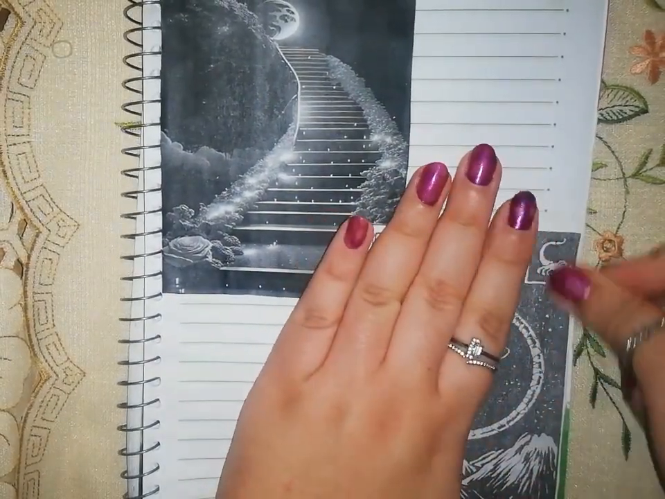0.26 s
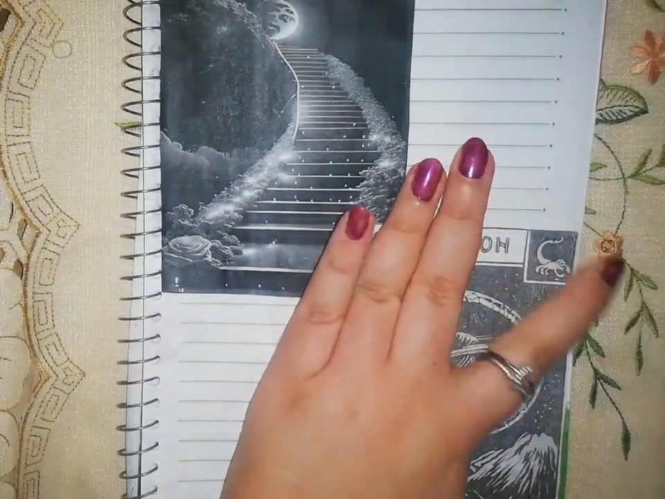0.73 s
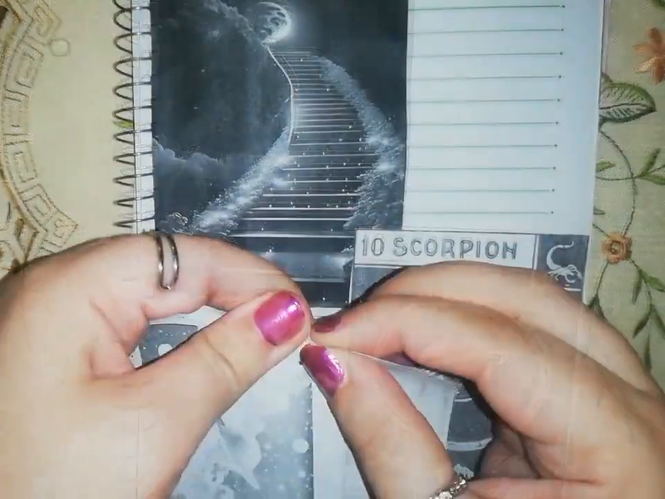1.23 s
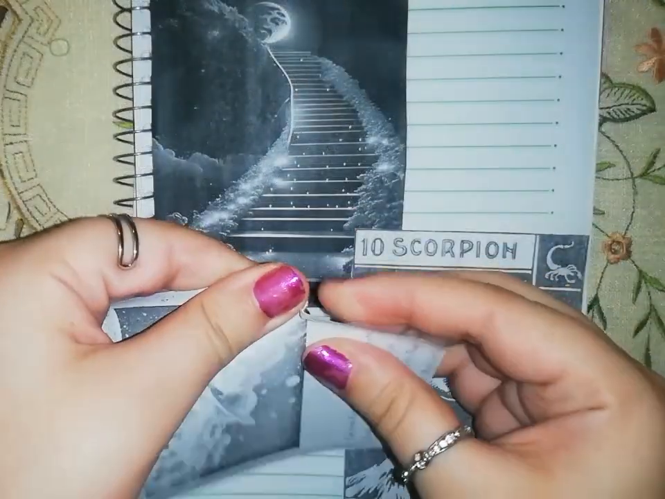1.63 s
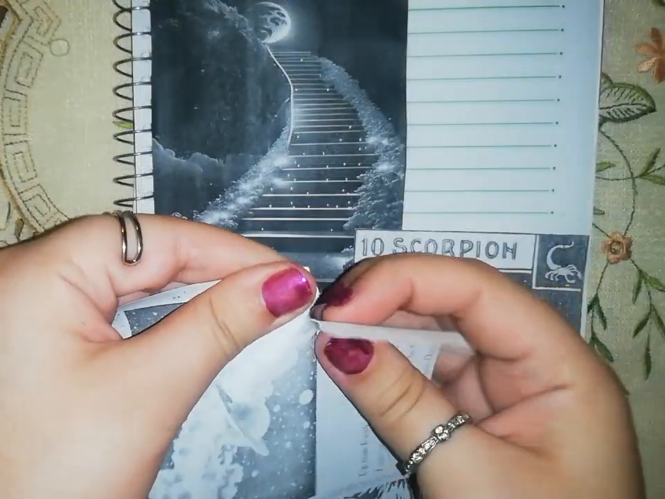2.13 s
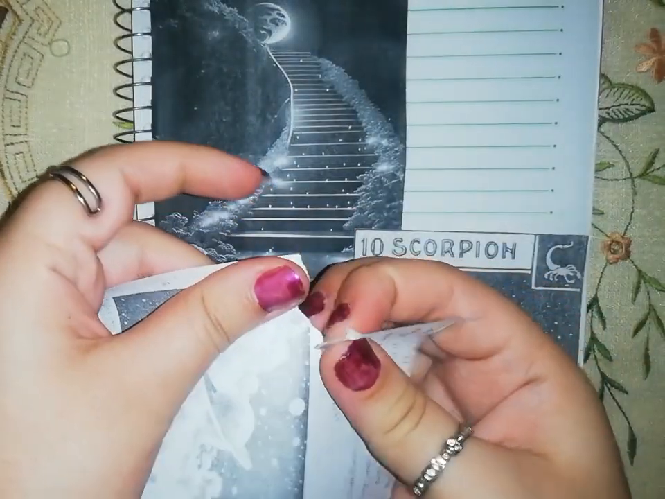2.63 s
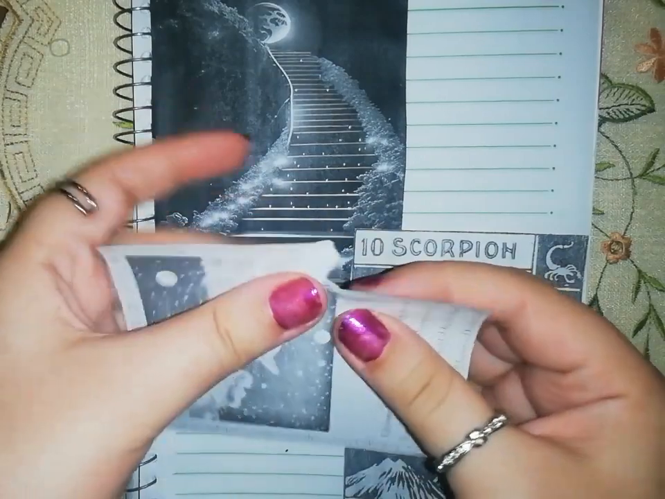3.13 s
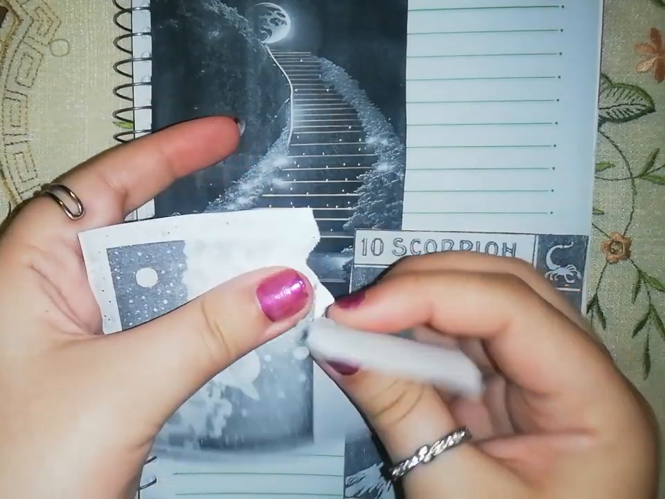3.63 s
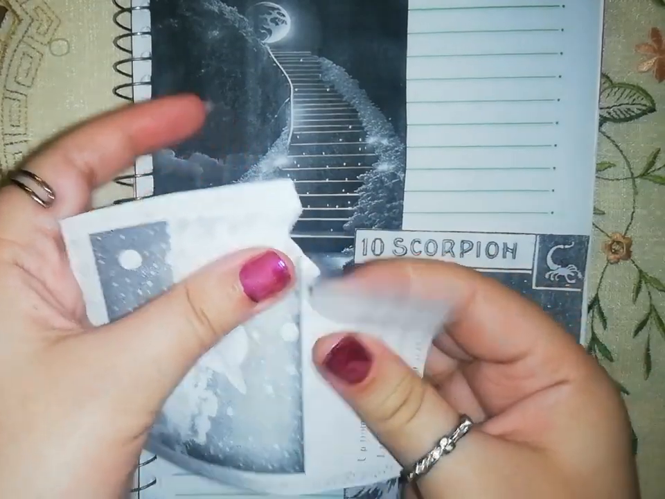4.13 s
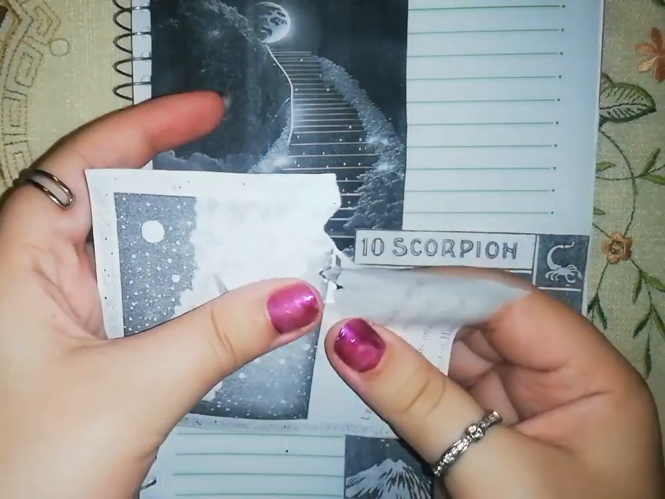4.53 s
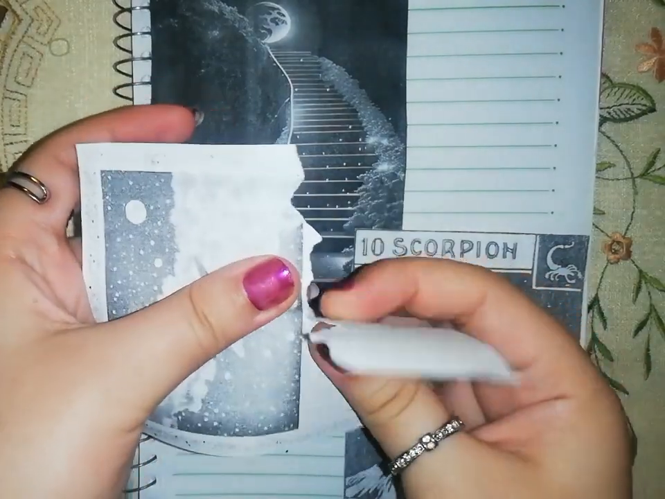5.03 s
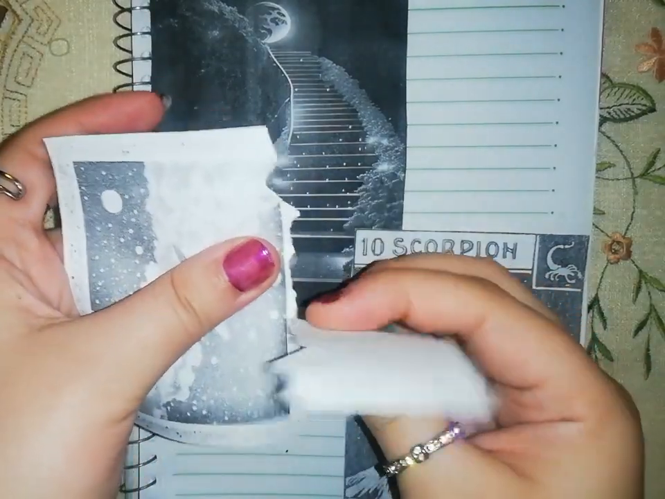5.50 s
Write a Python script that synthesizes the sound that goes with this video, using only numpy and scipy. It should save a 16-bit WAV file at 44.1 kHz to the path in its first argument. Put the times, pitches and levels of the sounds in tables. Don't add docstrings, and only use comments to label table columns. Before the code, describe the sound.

In a small quiet room with faint hum and hiss, hands pat a notebook with low soft thumps and lightly brush the page. After about a second, paper rustles and tears very close to a phone microphone, in short crisp rips broken by light crinkles, pops and pauses. The tearing is sharp on the left, duller and scattered on the right.

```python
import sys
import numpy as np
from scipy import signal
from scipy.fft import rfft, irfft
from scipy.io import wavfile
from scipy.ndimage import uniform_filter1d, map_coordinates

SR = 44100
rng = np.random.default_rng(int(sys.argv[2]) if len(sys.argv) > 2 else 0)


def volts_from_db(level):
    exponent = np.asarray(level, float) / 20
    return 10 ** exponent


def dump(signal):
    limited = np.clip(np.atleast_2d(signal).T, -1, 1)
    pcm = np.round(limited * 32767).astype(np.int16)
    wavfile.write(sys.argv[1], SR, pcm)


N = 254016
TIME = np.arange(N) / SR
HZ = np.maximum(np.fft.rfftfreq(N, 1 / SR), 1)

# pitch_hz, level_db (per Hz)
ROOM_HISS = [(12, -27), (20, -6.5), (48, -0.5), (108, -5), (143, -0.5), (480, -16), (772, -14), (2510, -16),
             (8890, -19), (15200, -25.5), (16500, -40)]
# pitch_hz, likeness (-1 to 1)
ROOM_LIKENESS = [(60, 0.91), (130, 0.92), (290, 0.096), (640, -0.79), (1400, 0.31), (3000, -0.1)]
# pitch_hz, width_hz, lift_db
PORT_RINGS = [(9000, 1100, 3.5), (10880, 1000, 8)]
# start_s, end_s, level_db
STROKES = [
    (0.047, 0.133, -59),
    (0.149, 0.323, -55.5),
    (0.344, 0.433, -60.5),
    (0.476, 0.554, -58.5),
    (0.627, 0.66, -56),
    (0.683, 0.795, -60),
    (0.823, 0.916, -63.5),
]
# start_s, peak_db, pad_ring_hz
THUMPS = [(0.075, -31, 102), (0.087, -40, 215), (0.11, -43, 65.4), (0.137, -44.5, 350), (0.155, -26.5, 110),
          (0.478, -33.5, 113), (0.488, -52, 192), (0.502, -42, 70.4), (0.526, -51, 120), (0.543, -53, 157),
          (0.827, -40, 217.3), (0.913, -53, 177), (1.056, -55.5, 247), (0.44, -57, 190), (0.33, -54, 170),
          (0.255, -58, 150), (1, -48, 297), (1.516, -52.5, 214), (2.711, -51.5, 228), (2.554, -56, 263),
          (2.745, -55, 170), (2.969, -49, 260), (3.25, -54, 199), (4.21, -56, 170), (4.48, -53, 190),
          (5.142, -55, 197), (5.626, -53.5, 307)]
# pitch_hz, level_db, t60_s
TABLE_MODES = [(60.5, 1, 0.43), (107.4, -7, 0.65), (170, 5.5, 0.073), (214, 8.5, 0.047), (320, -43, 0.12)]
# pitch_hz, level_db (per Hz)
PAPER_COLOUR = [(1300, -10.5), (2300, -12), (2800, -9.5), (4400, -9), (7300, -7.5), (8900, -4.5),
                (10500, -10), (15200, -24.5), (16400, -51)]
# pitch_hz, level_db (per Hz)
SHEET_COLOUR = [(200, -24.5), (450, -20), (750, 2.5), (1000, -0.5), (1200, 3.5), (1800, 2), (3000, -1),
                (5000, -50.5)]
# peak_s, crackle_db,
# rise_s, fall_s, sheet_minus_crackle_db
SHEET_PULLS = [(1.313, -41, 0.078, 0.091, 3), (1.362, -44, 0.053, 0.054, -0.5), (1.917, -41, 0.063, 0.082, -10),
               (2.389, -32, 0.04, 0.04, -8), (2.538, -27.5, 0.015, 0.034, -1.5), (2.564, -25.5, 0.027, 0.059, -9),
               (3.45, -31, 0.0073, 0.046, -30), (3.471, -31, 0.037, 0.065, -17),
               (3.818, -32.5, 0.0082, 0.024, -10.5), (3.856, -41.5, 0.054, 0.12, -7),
               (4.748, -26, 0.014, 0.0092, -12), (4.765, -39, .02, 0.066, -26), (4.862, -30, 0.011, 0.11, -14.5),
               (4.922, -35.5, 0.048, 0.047, -20), (4.939, -35, 0.051, 0.031, -14),
               (5.346, -43.5, 0.0058, 0.19, -12), (5.378, -42, 0.023, 0.054, -15), (5.42, -32, 0.066, 0.096, -22),
               (5.493, -37.5, 0.15, 0.019, -17.5),
               (1.009, -62.5, 0.0082, 0.05, 13.5), (1.161, -56.5, 0.0046, 0.2, 8.5),
        (1.535, -56.5, 0.12, 0.033, -3), (1.609, -47, 0.0096, 0.049, -10), (1.865, -56, .021, .1, -13),
        (2.085, -51.5, 0.045, 0.085, -6), (2.158, -36.5, 0.019, 0.016, -10),
        (2.272, -50.5, 0.063, 0.16, -14), (2.43, -49.5, 0.019, 0.24, -3.5), (2.64, -58, .03, 0.059, -4),
        (2.755, -43, 0.042, 0.039, 1), (2.992, -55, 0.06, 0.022, 16), (2.95, -49.5, 0.075, 0.045, -2.5),
        (3.208, -49, 0.0083, 0.06, 8), (3.16, -56.5, 0.063, 0.069, -1.5), (3.66, -51, 0.1, 0.042, -6),
        (3.736, -42, 0.022, 0.055, -18.5), (4.065, -44, 0.079, 0.061, -3.5), (4.212, -44, 0.041, 0.061, -6),
        (4.372, -49.5, 0.028, 0.077, -3), (4.43, -56, 0.035, 0.09, 4), (5.155, -58.5, 0.049, 0.077, 2),
        (5.556, -43.5, 0.033, 0.027, -23), (5.62, -50.5, 0.046, 0.15, -6.5)]
# start_s, crackle_db, length_ms
CRACKS = [(1.855, -23, 0.94), (1.865, -36, 2.1), (1.8982, -27, 0.97), (1.9166, -26, 2.7),
          (1.8962, -29, 1.6), (1.9593, -36, 0.91), (2.043, -31.5, 0.96), (2.094, -22, 0.806),
          (2.148, -46, 1), (2.2651, -27, 3.2), (2.287, -35.5, 2.2), (2.3779, -31, 3), (2.8485, -49.5, 15),
          (3.368, -40, 0.95), (3.491, -29, 3.4), (3.523, -32, 2.6), (3.548, -34.5, 3.2), (3.7372, -33, 1.4),
          (3.777, -38, 1.6), (3.863, -27.5, 2), (3.91, -37, 1.7), (3.974, -46, 1.2), (4.0247, -27.5, 0.9),
          (4.6958, -43.5, 0.33), (4.7146, -30, 0.6), (4.7208, -24, 2.8), (4.7426, -40, 2.1), (4.89, -25, 2),
          (5.409, -27, 1.3), (5.6104, -42, 9)]
# start_s, crackle_db
TICKS = [(1.8494, -34), (1.8851, -26.5), (1.9803, -38), (2.0019, -53), (2.5, -48), (2.527, -40),
         (2.961, -34), (4.003, -40), (2.195, -45), (2.271, -36), (2.2783, -30.5), (2.331, -42), (2.37, -35),
         (3.425, -44), (3.555, -36), (3.5676, -40), (3.794, -39), (3.984, -39), (4.668, -49), (5.298, -48),
         (1.159, -46), (1.184, -42.5), (1.2175, -55), (1.234, -44), (1.2635, -59), (1.32, -44),
         (1.4382, -50.5), (2, -50), (2.157, -70), (4.404, -45), (3.852, -34), (3.858, -36), (3.922, -43),
         (3.4338, -43), (3.453, -23), (5.412, -42), (5.353, -43), (2.55, -31), (2.559, -23), (2.568, -33),
         (2.598, -42), (4.885, -33), (4.864, -34), (4.87, -43), (0.985, -58)]
# start_s, crackle_db
NICKS = [(1.869, -24.5), (1.9755, -43), (2.383, -22.5), (4.946, -37), (5.4222, -39), (1.31, -46),
         (1.316, -39), (1.34, -36), (1.8737, -26), (1.8805, -35), (1.909, -36), (1.914, -38), (1.9227, -32),
         (1.937, -48), (1.967, -43), (2.361, -38), (2.372, -32), (2.397, -36), (2.401, -36), (2.476, -48),
         (2.525, -40), (2.541, -30), (2.5622, -32), (2.6098, -46), (3.438, -37), (3.4451, -29),
         (3.4485, -41), (3.4632, -43), (3.47, -31), (3.4935, -25.5), (3.503, -40), (3.5613, -41),
         (3.787, -44), (3.8189, -34), (3.8454, -29), (3.853, -37), (3.888, -36), (3.899, -35),
         (4.0614, -42), (4.426, -54), (4.86, -27), (4.915, -31), (4.916, -31), (4.9369, -24), (5.351, -51),
         (5.372, -41), (5.414, -42), (5.431, -41), (5.4437, -36), (5.451, -31), (5.4604, -22.5),
         (5.4625, -39), (5.477, -30), (5.488, -35), (5.4962, -35), (5.501, -40)]
# start_s, crackle_db, length_ms, sheet_minus_crackle_db
FOLDS = [(1.2385, -37, 0.67, -5.5), (2.076, -41, 7.6, -12), (2.3918, -31.5, 11.3, -13.5),
         (2.44, -31, 5.9, -11), (2.4692, -43, 2.5, -24), (2.5357, -23, 1, -12), (2.581, -30.5, 9.1, -21),
         (2.5924, -29, 0.66, -12.5), (2.746, -33.5, 1.3, -2.5), (2.9465, -35, 2.1, -3.5),
         (3.456, -48, 0.91, -7), (3.8148, -28, 1.6, -18), (3.874, -17.5, 1.7, -20.5),
         (4.2656, -31.5, 1.1, -9), (4.323, -45, 2.1, 1.5), (4.735, -47, 2.4, -21),
         (4.755, -29.5, 3.6, -15.5), (4.835, -35, 4.2, -21), (4.843, -27, 4.5, -14), (4.855, -35, 9.7, -26),
         (4.9336, -24, 1.8, -18.5), (4.9432, -21.5, 2.2, -28), (5.0702, -33, 1.16, -11.5),
         (5.1042, -43, 2.6, -4), (5.292, -47.5, 0.38, -21), (5.3052, -50, 2.6, -25),
         (5.3322, -30, 1.16, -32), (5.3363, -31.5, 3.6, -15.5), (5.382, -33.5, 2.7, -31),
         (5.3896, -30.5, 3.2, -34), (5.4576, -23.5, 0.8, -21.5)]
# start_s, sheet_db, crackle_minus_sheet_db, length_ms, ring_hz
POPS = [(1.1513, -44, 1.5, 10.2, 810), (1.176, -43, -33, 6.2, 950), (1.2, -47, -0.5, 4, 945),
        (1.3128, -38, -8, 2.6, 2220), (1.3428, -38, -1, 3.2, 1810), (1.3588, -33.5, -9, 4.2, 1790),
        (1.625, -48, -16, 9.9, 850), (2.573, -30.5, 5, 1.1, 1000), (2.6522, -49, 6, 3.8, 740),
        (2.7133, -35, 4.5, 1.5, 760), (2.759, -44, -19, 2.15, 1220), (3.2008, -29.5, -18, 3.2, 2601),
        (3.2241, -39.5, 1.5, 3.7, 606), (4.068, -32, 1, 4.6, 1870), (4.2102, -37.5, 4.5, 1.05, 900),
        (4.37, -48.5, 6, 7.7, 1205), (5.143, -48.5, 2.5, 2.9, 810), (5.157, -38, -30, 2.7, 750)]
# start_s, sheet_db, crackle_minus_sheet_db, length_ms, ring_hz
SLAPS = [(1.0006, -32.5, -19, 2.14, 910), (1.5991, -45, -6, 0.35, 1990), (2.973, -44.5, -14, 11, 890),
         (2.9804, -37, -5, 0.6, 3380), (2.994, -48, -21, 7, 1040), (1.013, -43.5, -17, 3.3, 1420),
         (1.022, -56.5, -16, 25, 2700), (4.4246, -43, -18, 1.2, 2200), (4.2927, -40.5, -10, 2, 950),
         (4.413, -28.5, -15, 3.9, 2080), (5.626, -43.5, -5.5, 1.6, 814)]
# start_s, sheet_db, ring_hz
CRINKLES = [(0.919, -56.5, 850), (1.728, -53.5, 800), (2.885, -52, 905.6), (3.03, -49.5, 840),
            (3.0714, -49, 920), (3.103, -51, 905), (3.159, -53, 1900), (3.249, -45, 1100),
            (3.266, -47, 745), (3.658, -56, 1120), (3.7, -54.5, 800), (4.038, -46, 1000), (4.19, -50, 775),
            (4.473, -48.5, 900), (4.491, -52.5, 890), (4.514, -48.5, 1090), (4.54, -56, 694),
            (5.543, -52.5, 910), (5.65, -52, 900)]
# time_s, brightest_hz
FLAP_AIM = [(1.1, 6700), (1.8, 7500), (2.0, 8500), (2.3, 9000), (2.38, 6740), (2.56, 6900), (3.2, 7740),
            (3.45, 9300), (3.8, 7950), (3.9, 9000), (4.7, 7560), (4.86, 7860), (4.93, 9450), (5.3, 5740),
            (5.36, 5900), (5.4, 9700), (5.46, 6850), (5.7, 7600)]
# start_s, end_s, pitch_hz, lift_db
GRIPS = [(0.987, 1.1, 6480, -19), (.99, 1.1, 1450, 3.5), (0.992, 1.097, 3730, 2), (1.137, 1.244, 870, 6.5),
         (1.14, 1.243, 5080, 12), (1.14, 1.25, 9150, 5), (1.14, 1.4, 5660, -9), (1.14, 1.25, 4340, -9),
         (1.26, 1.4, 4590, 5.5), (1.256, 1.4, 7970, 3), (1.247, 1.4, 9500, -0.5), (1.252, 1.4, 3680, 4),
         (1.839, 1.945, 2290, 9), (1.84, 1.937, 6850, 8.5), (1.846, 1.99, 9000, 3.5),
         (1.84, 1.95, 10300, -7), (1.84, 1.953, 4400, -4), (2.347, 2.42, 2219, -14),
         (2.347, 2.47, 5060, -11), (2.353, 2.47, 6770, 7), (2.354, 2.42, 8340, -3.5),
         (2.414, 2.47, 3470, 7.5), (2.42, 2.47, 1130, 3), (2.52, 2.615, 2680, -6), (2.52, 2.62, 5000, -1.5),
         (2.52, 2.62, 9900, -6), (2.526, 2.62, 3540, 5.5), (2.93, 3.02, 7500, -2), (3.19, 3.28, 7150, 5),
         (3.19, 3.28, 6070, 3), (0.148, .32, 8500, 3), (3.43, 3.57, 2330, 5), (3.427, 3.58, 5150, 3.5),
         (3.43, 3.56, 3880, -5), (3.43, 3.567, 11500, 7), (3.8, 3.932, 2480, -17), (3.8, 3.93, 4400, -8),
         (4.4, 4.432, 3500, 6.5), (4.398, 4.47, 6780, 2), (4.4, 4.47, 5360, -9), (4.7, 4.79, 3500, 6.5),
         (4.7, 4.91, 1320, -14), (4.702, 4.78, 9780, -4), (4.694, 4.79, 7300, -1), (4.915, 4.98, 8900, 3.5),
         (5.32, 5.522, 1950, 7), (5.32, 5.417, 3360, 8), (5.315, 5.4, 7650, -9), (5.32, 5.52, 2630, -10),
         (5.4, 5.52, 4870, 6.5)]
# time_s, lag_ms
PAGE_GAP = [
    (1.0, .68),
    (3.3, .68),
    (3.45, .62),
    (3.6, .68),
    (5.28, .68),
    (5.33, .77),
    (5.47, .77),
    (5.55, .68),
]
# pitch_hz, width_hz, lift_db
HAND_HOLLOWS = [(3635, 137, 4), (5150, 140, 0.5), (1900, 290, 1.5), (7200, 220, 3), (950, 124, 4)]
# pitch_hz, loss_db (negative lifts)
PHONE_SHADOW = [(280, -7), (700, 12), (2400, 14.5), (4400, 10), (8400, 20), (11000, 4.5), (15000, 11.5)]

CREASE_HZ, CRACKLE_HZ = 2500, 5500
PORT_LAG_S = 0.0003


def unit(x):
    return x / np.sqrt(np.mean(x ** 2))


def along(table):
    hz, value = np.transpose(table)
    return np.interp(np.log(HZ), np.log(hz), value)


def causal(db):
    mirrored = np.r_[db, db[-2:0:-1]]
    return np.exp(np.conj(signal.hilbert(mirrored * np.log(10) / 20))[:len(db)])


def shape(x, response):
    return irfft(rfft(x) * response, N)


def above(hz, steep=9.75):
    return -10 * np.log10(1 + (hz / HZ) ** steep)


def below(hz, steep=8.74):
    return np.maximum(-10 * np.log10(1 + (HZ / hz) ** steep), -60)


def bell(hz, width):
    return 1 / (1 + (2 * (HZ - hz) / width) ** 2)


def ring(x, hz, t60):
    pole = np.exp(2j * np.pi * hz / SR - np.log(1000) / (t60 * SR))
    return signal.lfilter([1], [1, -pole], x).imag


def drift(rate):
    return np.interp(TIME * rate, np.arange(100), rng.standard_normal(100))


def flutter(rate, depth_db):
    steps = np.cumsum(rng.random(N) < rate / SR)
    level = rng.standard_normal(N)[steps]
    return volts_from_db(depth_db * uniform_filter1d(level, size=24))


def fibres(rate, spread_db, hiss):
    clicks = (rng.random(N) < rate / SR) * np.clip(rng.standard_normal(N), -2, 2)
    clicks = clicks * volts_from_db(spread_db * np.minimum(rng.exponential(size=N), 1.8))
    share = np.reshape(hiss, (-1, 1))
    rubbing = share * rng.standard_normal((len(share), N))
    return (unit(clicks) + rubbing) / np.sqrt(1 + share ** 2)


def quiet_room():
    swell = 1.5 * drift(rate=5.92)
    like = np.clip(along(ROOM_LIKENESS), -.99, .99)
    mid, side = (rfft(rng.standard_normal(N)) * volts_from_db(along(ROOM_HISS)) for _ in range(2))
    level = np.sqrt(np.maximum(1 + like, .4))
    mid = mid * np.sqrt(1 + like) / level
    side = side * np.sqrt(1 - like) / level
    ports = []
    for sign, (hz, width, db) in zip((1, -1), PORT_RINGS):
        colour = volts_from_db(db * bell(hz, width) - 0.7 * (HZ > 6000))
        hiss = irfft((mid + sign * side) * colour, N)
        ports.append(hiss + shape(hiss, volts_from_db(below(450))) * (volts_from_db(swell) - 1))
    hum = volts_from_db(2.5 * drift(rate=9)) * np.sin(2 * np.pi * 100 * TIME + 1.2 * drift(rate=7))
    return volts_from_db(-66.5) * unit(np.array(ports)) + volts_from_db(-77) * unit(hum)


def strokes():
    touch = np.zeros(N)
    for start, end, db in STROKES:
        touch += volts_from_db(db) * np.clip(np.minimum(TIME - start, end - TIME) / 0.0081, 0, 1)
    hiss = shape(fibres(rate=4500, spread_db=-7.0, hiss=1.3)[0], causal(along(PAPER_COLOUR)))
    return touch * unit(hiss) * flutter(rate=190, depth_db=0.5)


def thumps():
    out = np.zeros(N)
    t = np.arange(12000) / SR
    push = np.sin(np.pi * np.minimum(t / 0.0029, 1)) ** 2
    for s, db, pad_hz in THUMPS:
        hit = volts_from_db(19.5) * ring(push, pad_hz, 0.055)
        chance = rng.standard_normal((len(TABLE_MODES), 2))
        for (hz, mode_db, t60), (louder, higher) in zip(TABLE_MODES, chance):
            hit = hit + volts_from_db(mode_db + 1.5 * louder) * ring(push, hz * (1 + .04 * higher), t60)
        slap = ring(rng.standard_normal(len(t)) * np.exp(-t / 0.0027), 670, 0.014)
        slap_db = -20.0 + 1.3 * (max(db, -40) + 26.5)
        hit = hit / np.abs(hit).max() + volts_from_db(slap_db) * slap / np.abs(slap).max()
        settle = ring(rng.standard_normal(len(t)) * np.exp(-t / 0.032), 159, 0.06)
        hit = hit + volts_from_db(-16.5) * settle / np.abs(settle).max()
        at = int((s + 0.004) * SR)
        out[at:at + len(t)] += volts_from_db(db) * hit[:N - at]
    out = shape(out, causal(np.maximum(above(66, steep=5.), -50)))
    return np.array([out, .95 * np.roll(out, shift=8)])


def pulls():
    SWELL_DB, SWELL_ROUND = 20, 1.04
    held_db = np.reshape((-73, -72, -73), (3, 1))
    power = volts_from_db(held_db - 60 * (TIME < 0.93)) ** 2
    for s, db, rise, fall, sheet_db in SHEET_PULLS:
        at = slice(max(int((s - .5) * SR), 0), int((s + .5) * SR))
        t = TIME[at] - s
        away = np.maximum(-t / max(rise, .003), t / max(fall, .003))
        swell = volts_from_db(db - SWELL_DB * away ** SWELL_ROUND)
        crease_db = -3 + 0.16 * sheet_db
        power[:, at] += (swell * volts_from_db(np.array([[0], [crease_db], [sheet_db]]))) ** 2
    return np.sqrt(power)


def slips(rate, spread_db, fade_s, steady):
    starts = (rng.random(N) < rate / SR) * volts_from_db(spread_db * np.clip(rng.standard_normal(N), -2, 1))
    jerks = signal.lfilter([1], [1, -np.exp(-1 / (fade_s * SR))], uniform_filter1d(starts, size=30))
    return unit(np.minimum(unit(jerks), 2) + steady)


def snaps():
    small = [(s, db, -2.5, sheet_db, ms) for s, db, ms, sheet_db in FOLDS]
    small += [(s, db, -14, -23.5, ms) for s, db, ms in CRACKS]
    small += [(s, db, -14, -23.5, 1.9) for s, db in TICKS]
    small += [(s, db, -13, -23.5, 0.63) for s, db in NICKS]
    pitch = 1000 * (2290 / 1000) ** rng.random(size=200)
    pops = POPS + [(s, db, -21, 1.14, hz) for s, db, hz in CRINKLES]
    breaks = [(s, db + up, -2 - 0.14 * up, -up, ms, hz) for s, db, up, ms, hz in pops]
    breaks += [(s, db + up, -1.5 - up, -up, ms, hz) for s, db, up, ms, hz in SLAPS]
    return breaks + [(*row, hz) for row, hz in zip(small, pitch)]


def bodies():
    paper = along(PAPER_COLOUR)
    crackle = paper + above(CRACKLE_HZ)
    crease = paper + above(CREASE_HZ) + below(CRACKLE_HZ)
    sheet = along(SHEET_COLOUR) + below(CREASE_HZ)
    return [causal(db) / np.sqrt(np.mean(volts_from_db(db) ** 2)) for db in (crackle, crease, sheet)]


def tear():
    EARLY_S, RISE_S = 0.00088, .0006
    pull = pulls()
    jerks = slips(rate=420, spread_db=3.0, fade_s=.0015, steady=.9)
    hard = np.clip((20 * np.log10(pull[0]) + 60) / 18, .45, 1)
    drive = pull * fibres(rate=5000, spread_db=5.5, hiss=(.8, 1.1, 1.4)) * jerks ** hard
    rings = np.zeros(N)
    burst = fibres(rate=16000, spread_db=-1.0, hiss=(.9, .9, .9))
    t = np.arange(2000) / SR
    for s, db, crease_db, sheet_db, ms, hz in snaps():
        first = int((s - EARLY_S) * SR)
        at = slice(first, first + len(t))
        start = np.minimum(t / max(RISE_S, .25 * ms / 1000), 1) ** 2
        swell = start * (np.exp(-(t / (0.0012 * ms)) ** 2) + 0.12 * np.exp(-t / 0.0048))
        push = burst[:, at] * swell
        push = push / np.sqrt(np.mean(push[:, :int(ms * SR / 1000)] ** 2, axis=1, keepdims=True))
        push[:, int(RISE_S * SR)] += volts_from_db(10) * np.exp(-ms ** 2) * np.sign(push[0, 1])
        drive[:, at] += volts_from_db(db + np.array([[0], [crease_db], [sheet_db - 5.0]])) * push
        tone = ring(push[2], hz, .009) + .6 * ring(push[1], 1.6 * hz, .005)
        rings[at] += volts_from_db(db + sheet_db + 8.5) * tone / np.abs(tone).max()
    rings = shape(rings, causal(np.maximum(above(340), -40)))
    return sum(shape(x, body) for x, body in zip(drive, bodies())) + rings


def patches(x):
    BAND_HZ, AIM_WIDTH_HZ = 1274, 970
    aim = np.interp(TIME, *np.transpose(FLAP_AIM))
    out = x
    for k in range(2, 10):
        aimed = np.exp(-((k * BAND_HZ - aim) / AIM_WIDTH_HZ) ** 2) - .4
        db = drift(rate=14) + 3.5 * aimed
        band = shape(x, np.clip(1 - np.abs(HZ / BAND_HZ - k), 0, 1))
        out = out + band * (volts_from_db(db) - 1)
    return out


def grips(x):
    out = x.copy()
    for start, end, hz, db in GRIPS:
        at = slice(int(start * SR), int(end * SR))
        held = np.clip(np.minimum(TIME[at] - start, end - TIME[at]) / 0.0096, 0, 1)
        width = 6.3 if db > 0 else 13
        band = signal.lfilter(*signal.iirpeak(hz, np.sqrt(hz) / width, fs=SR), out[at])
        out[at] += held * (volts_from_db(db) - 1) * band
    return out


def page_echo(x):
    lag = SR / 1000 * np.interp(TIME, *np.transpose(PAGE_GAP)) * (1 + .025 * drift(rate=4))
    dulled = shape(x, volts_from_db(below(6500, steep=3.)))
    echo = map_coordinates(dulled, [np.arange(N) - lag], order=3)
    hollow = sum(db * bell(hz, width) for hz, width, db in HAND_HOLLOWS)
    return shape(x - 0.076 * echo, causal(hollow)) * 0.53


def echoes(x, t60, after, db):
    t = np.arange(int(.5 * SR)) / SR
    fade = np.exp(-np.log(1000) * t / t60) * (t > after)
    tails = [unit(rng.standard_normal(len(t)) * fade) / np.sqrt(len(t)) for _ in range(2)]
    return np.array([volts_from_db(g) * signal.fftconvolve(x, tail)[:N] for g, tail in zip(db, tails)])


def far_port(near):
    shaded = shape(near, causal(-along(PHONE_SHADOW)))
    late = np.exp(-2j * np.pi * HZ * PORT_LAG_S)
    direct = shape(shaded, volts_from_db(below(3260, steep=14.0)) * late)
    treble = shape(shaded, volts_from_db(above(1160, steep=2.6)))
    turn = 3 * drift(rate=8)
    a, b = [echoes(treble, t60=0.23, after=PORT_LAG_S, db=(-1, -1)) for _ in range(2)]
    moving = np.cos(2 * turn) * a[1] + np.sin(2 * turn) * b[0]
    return direct + np.cos(turn) * a[0] + np.sin(turn) * moving


def scene():
    paper = page_echo(grips(patches(tear()) + strokes()))
    walls = causal(below(5700, steep=4.8) + above(980, steep=2.1))
    room = echoes(shape(paper, walls), t60=0.29, after=0.00053, db=(-22, -24))
    return np.array([paper, far_port(paper)]) + room + thumps() + quiet_room()


def top_cut(x):
    return signal.sosfilt(signal.butter(12, 16750, fs=SR, output="sos"), x)


def record(dry):
    top = signal.ellip(8, .2, 60, 16650, fs=SR, output="sos")
    mix = signal.sosfilt(top, dry)
    return top_cut(mix)


dry = scene()
out = record(dry)
dump(out)
```